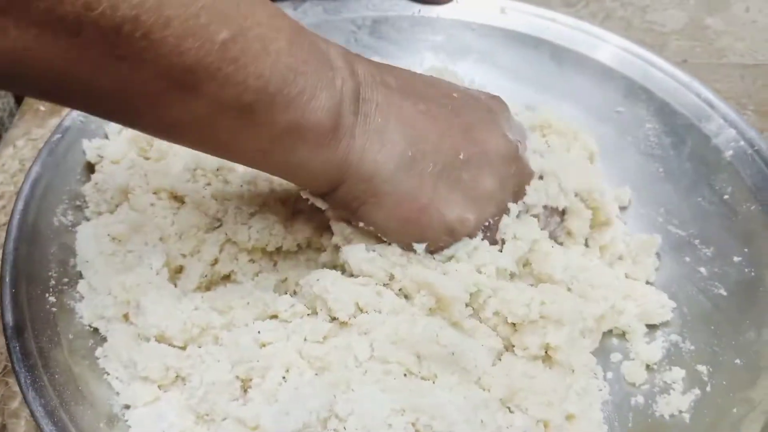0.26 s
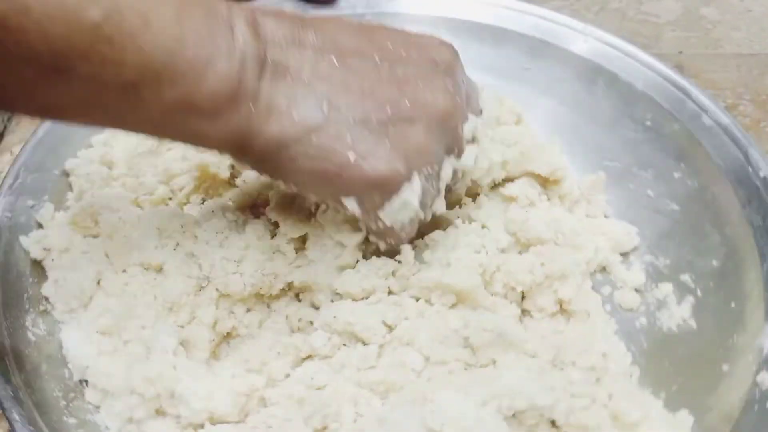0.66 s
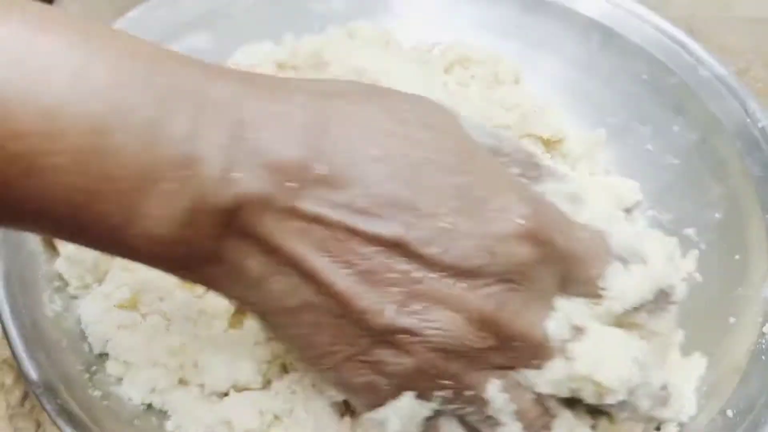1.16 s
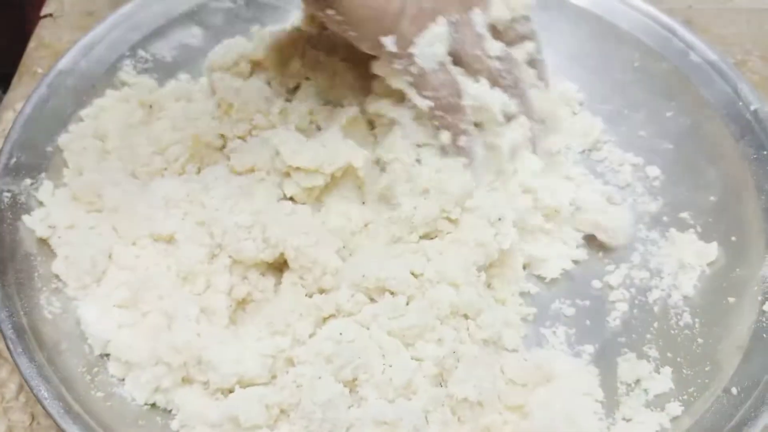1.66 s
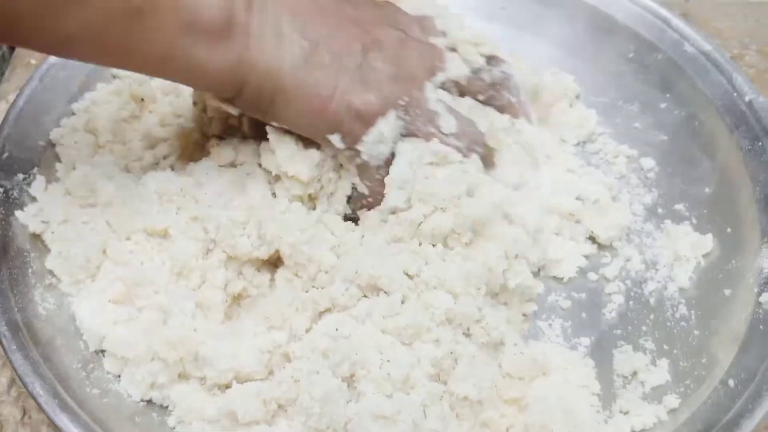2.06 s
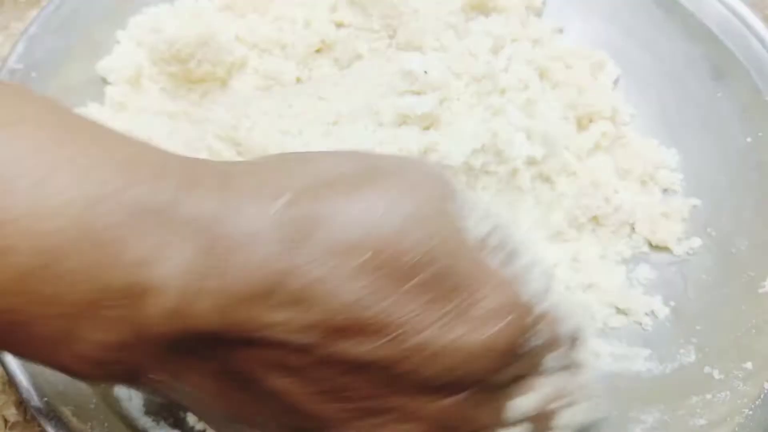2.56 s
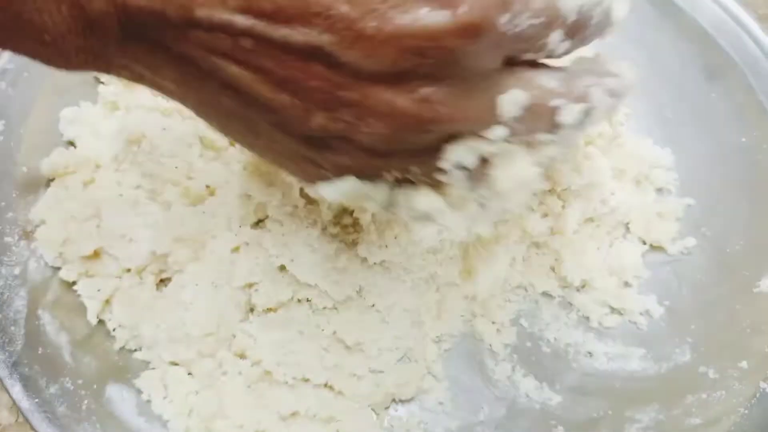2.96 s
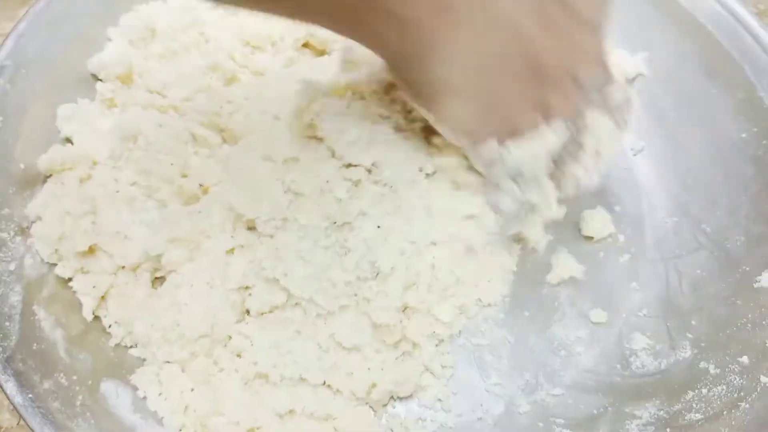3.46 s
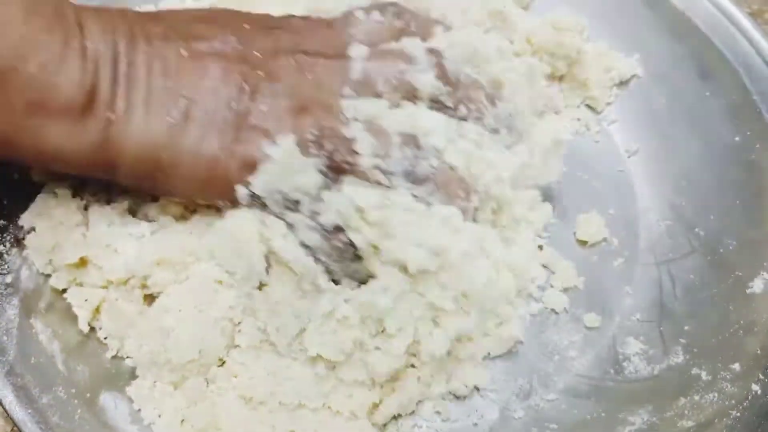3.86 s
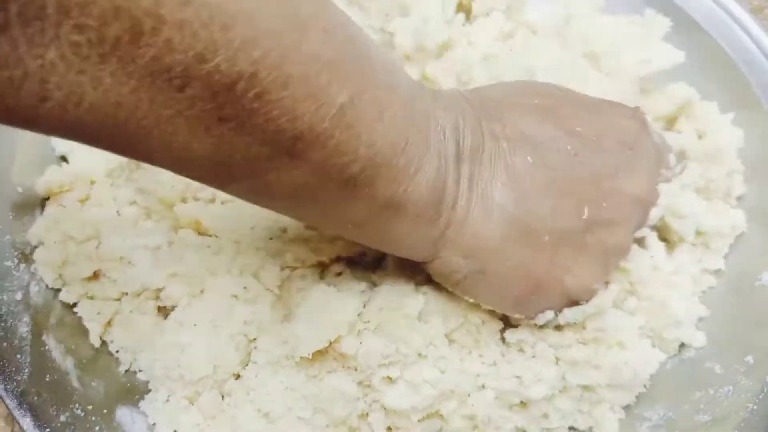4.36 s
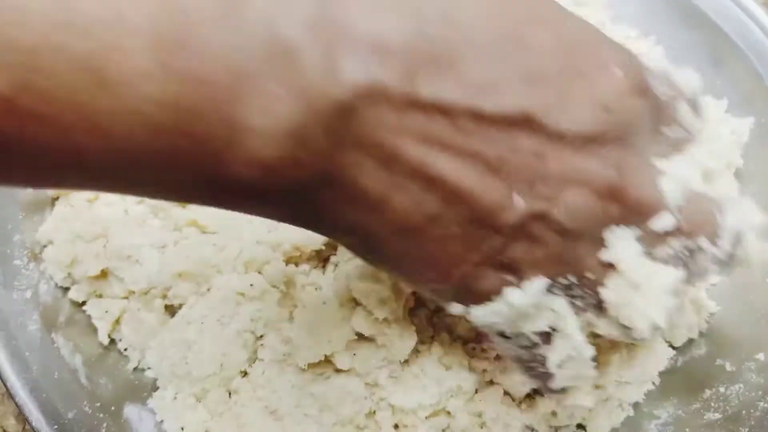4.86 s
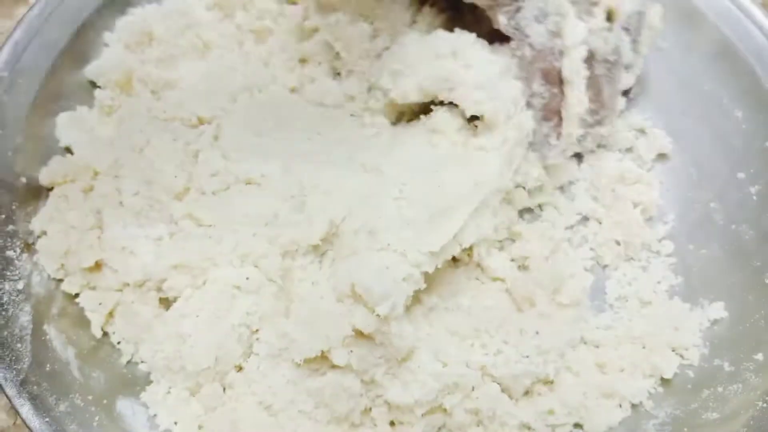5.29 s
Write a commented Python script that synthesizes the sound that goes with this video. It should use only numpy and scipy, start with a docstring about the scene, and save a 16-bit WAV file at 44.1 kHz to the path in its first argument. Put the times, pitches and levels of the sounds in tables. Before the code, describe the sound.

Moist crumbs rustle and hiss over a wide metal plate under a working hand, with dull pats, sharp ticks and a faint hum.

```python
"""Crumbly dough rustles softly under a kneading hand in a wide steel plate.
Sweeping fingers drag crumbs over the steel, which hisses, ticks and once clinks; lumps land with dull pats.
Random slips and noise bursts excite filters shaped like dough and steel; friction keeps plate modes sounding.
A low hum of two noise drones, rising tones and faint hiss fills the room; both channels are alike."""
import sys
import numpy as np
from scipy import signal
from scipy.fft import rfft, irfft, next_fast_len
from scipy.io import wavfile

SR = 44100
rng = np.random.default_rng(int(sys.argv[2]) if len(sys.argv) > 2 else 0)


def materialize(psi):
    """Save the field psi as 16-bit PCM at rate SR to the path in sys.argv[1].

    A 1-D psi becomes a single channel; in a 2-D psi each row is a channel.
    """
    bounded = np.clip(np.atleast_2d(psi).T, -1, 1)
    quanta = np.round(bounded * 32767).astype(np.int16)
    wavfile.write(sys.argv[1], SR, quanta)


N = 243695
TIME = np.arange(N) / SR

# strokes of the hand: full_pressure_s, attack_s, hold_s, release_s, dough_db, fine_crumbs_db, coarse_crumbs_db
HAND_STROKES = [ (.03, 0.14, 0.34, .5, -47.5, -50.5, -56.5), (.32, 0.24, 0.016, 0.15, -49, -49.5, -78),
                (.52, 0.32, 0.14, 0.31, -51.5, -59, -65), (.745, 0.24, 0.074, 0.063, -56, -47.5, -55.5),
                (1.02, 0.043, 0.14, 0.24, -64, -57, -56), (1.21, 0.13, 0.091, 0.44, -48.5, -41.5, -68),
                (1.45, 0.17, 0.14, 0.29, -49, -47.5, -72), (1.69, 0.16, 0.026, 0.14, -50.5, -41.5, -59),
                (1.98, .1, 0.097, .04, -51, -45.5, -52), (2.097, 0.0076, 0.0071, 0.1, -39, -31, -39),
                (2.28, 0.12, 0.017, 0.029, -72, -50.5, -58.5), (2.505, .02, .04, 0.15, -79, -32, -65),
                (2.59, 0.077, 0.042, 0.084, -46, -23, -44), (2.79, 0.099, 0.005, 0.04, -69, -49.5, -57),
                (3.053, 0.021, 0.046, 0.42, -44, -33, -41.5), (3.17, 0.079, 0.18, 0.11, -53.5, -34, -43),
                (3.57, 0.3, 0.057, 0.11, -55, -46, -50), (3.8, 0.095, 0.064, .1, -59, -46.5, -56),
                (4.0, 0.24, .2, .19, -47, -34.5, -42.5), (4.42, 0.1, .14, 0.15, -54, -43.5, -54),
                (4.65, 0.063, 0.0067, 0.049, -68, -38, -52), (4.89, 0.18, .05, .1, -73, -53.5, -63),
                (4.963, 0.03, 0.14, 0.31, -53.5, -29.5, -50), (5.28, 0.34, 0.063, 0.28, -47, -36, -49)]
# moist dough, coloration of the rustle: frequency_hz, relative_level_db_per_hz
DOUGH_SPECTRUM = [(300, -21.5), (500, -15), (650, -20), (860, -5.5), (1050, -5.5), (1500, 0.5), (2200, 4.5),
                  (3200, 2), (4500, -5), (7000, 0), (10000, -5), (13500, -21.5), (15500, -10.5)]
# pockets of air squish out of the dough: centre_s, length_s, pitch_hz, level_db
AIR_POCKETS = [(0.064, 0.21, 1080, -57.5), (0.586, .05, 4080, -50), (0.727, 0.14, 510, -64.5),
               (0.918, 0.38, 2850, -60), (1.31, 0.41, 505, -62), (2.056, 0.11, 890, -56),
               (2.073, 0.044, 1800, -45.5), (3.404, .096, 810, -60.5), (3.632, 0.034, 785, -68),
               (3.945, 0.18, 1050, -58.5), (4.413, 0.036, 4270, -41.5), (4.615, 0.23, 620, -61),
               (5.19, 0.51, 890, -61), (5.345, 0.031, 954, -47), (5.498, 0.046, 794, -60.5)]
# sticky dough peels from the skin: centre_s, length_s, level_db
SKIN_PEELS = [(0.633, 0.024, -48.5), (0.765, 0.21, -48), (4.127, .26, -51.5), (4.655, 0.14, -49.5)]
# a soft thud as the hand takes hold: centre_s, length_s, pitch_hz, width_hz, level_db
GRIP_THUD = [(1.99, 0.018, 64, 46.3, -49.5)]
# dough lands on the plate: start_s, level_db, decay_to_minus_60_db_s
DOUGH_LANDINGS = [(2.091, -43.5, 0.04), (2.487, -47, 0.3), (3.046, -35.5, 0.087), (3.053, -39.5, 0.23),
                  (4.961, -46.5, 0.36)]
# dull spectrum of a landing lump: frequency_hz, relative_level_db_per_hz
LANDING_SPECTRUM = [(80, -25), (200, -1), (350, 3), (520, -2), (700, -8), (860, -5), (1200, -25),
                    (3000, -58)]
# fine crumbs hissing on steel: frequency_hz, relative_level_db_per_hz
FINE_CRUMB_SPECTRUM = [(1500, -43), (2700, -27), (3600, -18.5), (4450, -9.5), (4950, -2.5), (5700, -0.5),
                       (6600, -2), (7200, -8.5), (8200, -15), (9500, -20), (11500, -24.5), (13700, -30.5),
                       (15000, -13), (16000, -26)]
# coarse crumbs rasping: frequency_hz, relative_level_db_per_hz
COARSE_CRUMB_SPECTRUM = [(1500, -41), (2600, -10), (3300, -0.5), (4400, 1.5), (5500, -15), (8000, -23)]
# a finger rubs the bare steel and makes it sing: full_pressure_s, attack_s, hold_s, release_s, level_db
SINGING_RUBS = [(.77, 0.11, .02, 0.075, -51.5), (1.01, 0.058, 0.027, 0.14, -54.5),
                (1.17, 0.11, .02, 0.21, -44)]
# resonances of the rubbed steel: frequency_hz, width_hz, relative_level_db
SINGING_MODES = [(2154, 140, -4.5), (2220, 440, -6)]
# the hand bears down and the floor of the plate resounds: full_pressure_s, attack_s, hold_s, release_s, level_db
BEARING_PUSHES = [(2.12, .1, 0.27, .1, -75), (2.49, 0.0063, 0.098, .1, -54.5),
                  (2.58, .09, 0.076, 0.07, -44.5), (3.053, 0.016, 0.0033, 0.088, -42),
                  (4.965, 0.0088, 0.028, 0.29, -48.5)]
# resonances of the plate's floor: frequency_hz, width_hz, relative_level_db
PLATE_FLOOR_MODES = [(850, 56, -3), (1350, 280, -3.5), (2260, 63, 7.5), (2393, 80, 4)]
# nails and hard crumbs tick on the steel: start_s, level_db
STEEL_TICKS = [(2.0948, -18.5), (2.42, -45), (2.487, -24), (2.561, -15), (2.8813, -34), (2.93, -39),
               (3.04, -33), (3.0467, -23.5), (3.0528, -15.5), (3.0732, -14.5), (3.0979, -22),
               (4.037, -25.5), (4.308, -32), (4.456, -28.5), (4.9596, -21), (5.048, -19)]
# bright spectrum of a tick: frequency_hz, relative_level_db_per_hz
TICK_SPECTRUM = [(1500, -20.5), (3900, -41), (4900, 10.5), (6500, 6), (7800, -8), (12500, -23),
                 (15000, -18)]
# hard knocks that ring the whole plate: start_s, level_db
PLATE_KNOCKS = [(0.037, -51), (.512, -43), (.85, -41.5), (1.183, -15), (1.1856, -21.5), (2.095, -50)]
# plate resonances: frequency_hz, width_hz, relative_level_db
PLATE_MODES = [(871, 130, -8), (935, 160, -9.5), (1450, 350, -14), (2017, 126, 2), (2200, 280, 3),
               (2720, 1250, -8.5), (3400, 72, 0.5), (3745, 180, -4), (4980, 200, -2), (5710, 480, 3.5),
               (6670, 720, -5), (9580, 1000, -6), (8900, 12000, -28), (15200, 990, -15)]
# the free rim rings on after each contact: frequency_hz, width_hz, relative_level_db
FREE_RIM_MODES = [(2370, 13, -2), (3520, 15, -7)]
# course of the room hum, before trim: time_s, lower_drone_db, upper_drone_db
HUM_LEVELS = [(0.0, -53, -43), (1.86, -52, -49), (2.08, -46, -49), (2.14, -57, -64.5), (2.72, -46.5, -52.5),
              (3.57, -50.5, -48), (3.83, -52, -54), (3.94, -45, -54.5), (4.68, -52, -50),
              (5.26, -52, -61.5), (5.53, -48.5, -69)]
# lower drone: frequency_hz, relative_level_db_per_hz
LOW_DRONE_SPECTRUM = [(20, -38.5), (45, -29), (70, -23), (90, -13.5), (110, -3), (145, -1.5), (180, -8),
                      (240, -30), (400, -33)]
# low room modes that carry the upper drone: frequency_hz, width_hz, relative_level_db
LOW_ROOM_MODES = [(174.1, 20, -3.5), (194.1, 8.5, 4.5), (222.5, 15.8, -3), (257, 13.6, -5),
                  (275.9, 9.4, -1), (308.2, 19.2, -8), (194.3, 78, -11.5), (445, 45, -26)]
# notes that swell in the hum: full_level_s, hold_s, pitch_hz at that time, level_db
HUM_NOTES = [(2.201, 0.37, 101.3, -49.5), (2.646, 0.96, 108.4, -46.5), (3.402, 0.33, 99.9, -49.5),
             (3.921, 0.19, 108, -42), (4.36, 0.2, 138.5, -44), (4.899, 0.18, 123.9, -47.5),
             (5.381, .1, 102.2, -49.5)]
# faint hiss: frequency_hz, relative_level_db_per_hz
HISS_SPECTRUM = [(300, -7), (1000, -5.5), (2500, -19), (4000, 2), (6000, 9.5), (12000, -15), (16000, -40.5)]

ATTACK_CURVE = 1.3  # pressure builds as this power of time
FADE_DB = 20  # level lost in one release time
DOUGH_SAG_DB_PER_S, STEEL_SAG_DB_PER_S = 7.5, 5.5  # the dough gives way while the pressure is held
RESTING_DB = -78  # the dough stirs faintly even between strokes
SQUISH_WIDTH = 0.3  # bandwidth as a share of the pitch
PEEL_HZ, PEEL_WIDTH_HZ = 10500, 18000
RIM_DB = -28
LOW_DRONE_TRIM_DB, HIGH_DRONE_TRIM_DB, HISS_DB = 1.4, 0.72, -66
NOTE_RISE_HZ_PER_S, NOTE_ATTACK_S, NOTE_RELEASE_S, OCTAVE_DB = 14, 0.2, 0.11, -19.5
NOTE_WAVER_DB, NOTE_WAVER_PER_S = 1.8, 10
ROOM_T60_S, ROOM_DB = 0.28, -13.5
CUTOFF_HZ = 15900


def dough(gain):
    """Granular shear: moist crumbs slip and part under the palm."""
    slips = grains(per_s=3500, spread_db=-1.5) * from_db(1.2 * drift(45))
    moving = shifting(slips, patchy_db=2.9, rate=24)
    return gain * colour(moving, DOUGH_SPECTRUM)


def squishes():
    """Cavity resonance: each air pocket has its own pitch; peeling is always the same high fizz."""
    pockets = [(s, length, hz, SQUISH_WIDTH * hz, db) for s, length, hz, db in AIR_POCKETS]
    peels = [(s, length, PEEL_HZ, PEEL_WIDTH_HZ, db) for s, length, db in SKIN_PEELS]
    return swells(pockets + peels)


def pats():
    """Soft impact: yielding lumps give dull, crumbling thuds."""
    impacts = sum(from_db(db) * burst(s, t60) for s, db, t60 in DOUGH_LANDINGS)
    return colour(impacts, LANDING_SPECTRUM)


def scrape(fine_gain, coarse_gain):
    """Friction excitation: dragged crumbs drive the dense high modes of steel; coarse ones rasp lower."""
    slips = grains(per_s=5000, spread_db=1.5) * from_db(0.82 * drift(120))
    ringing = rms_one(diffuse(slips, t60=0.81, wet_db=-11))
    fine = colour(ringing, FINE_CRUMB_SPECTRUM)
    coarse = colour(grains(per_s=4000, spread_db=2.5), COARSE_CRUMB_SPECTRUM)
    return fine_gain * fine + coarse_gain * coarse


def rubbed_plate():
    """Sustained modal excitation: skin friction keeps the lower modes of the plate sounding."""
    singing_gain = pushes(SINGING_RUBS, STEEL_SAG_DB_PER_S)[0]
    singing = singing_gain * resonate(rng.standard_normal(N), SINGING_MODES)
    bearing_gain = pushes(BEARING_PUSHES, STEEL_SAG_DB_PER_S)[0]
    bearing = bearing_gain * resonate(grains(per_s=4500, spread_db=9.0), PLATE_FLOOR_MODES)
    return singing + bearing


def ticks():
    """Impact with damping: short bright contacts, quickly damped by the dough."""
    contacts = sum(from_db(db) * burst(s, t60=.013) for s, db in STEEL_TICKS)
    return colour(diffuse(contacts, t60=0.13, wet_db=-5.5), TICK_SPECTRUM)


def knocks():
    """Modal response to impact: a brief clatter, then a fading wash in the plate's resonances."""
    force = np.zeros(N)
    for s, db in PLATE_KNOCKS:
        clatter = burst(s, t60=0.021)
        wash = from_db(-10.5) * burst(s, t60=0.2)
        force += from_db(db) * (clatter + wash)
    return resonate(force, PLATE_MODES)


def rim(contact):
    """Lightly damped resonance: narrow modes of the free rim ring on after each contact."""
    return from_db(RIM_DB) * resonate(contact, FREE_RIM_MODES)


def hum():
    """Filtered noise and tones: two drones with rising notes in them, over faint hiss."""
    low_db, high_db = in_time(HUM_LEVELS)
    lower = from_db(low_db + LOW_DRONE_TRIM_DB) * colour(rng.standard_normal(N), LOW_DRONE_SPECTRUM)
    upper = from_db(high_db + HIGH_DRONE_TRIM_DB) * resonate(rng.standard_normal(N), LOW_ROOM_MODES)
    hiss = from_db(HISS_DB) * colour(rng.standard_normal(N), HISS_SPECTRUM)
    return lower + upper + sum(note(*row) for row in HUM_NOTES) + hiss


def note(s, hold, hz, db):
    """Phase as the integral of frequency: a wavering low tone and its octave glide upward."""
    pitch_hz = hz + NOTE_RISE_HZ_PER_S * (TIME - s) + 1.52 * drift(20)
    phase = 2 * np.pi * np.cumsum(pitch_hz) / SR
    waver = from_db(db + NOTE_WAVER_DB * drift(NOTE_WAVER_PER_S))
    gain = waver * envelope(s, NOTE_ATTACK_S, hold, NOTE_RELEASE_S)
    return gain * (np.sin(phase) + from_db(OCTAVE_DB) * np.sin(2 * phase))


def envelope(s, attack, hold, release, sag_db_per_s=0):
    """Exponential decay after a rise: gain reaches 1 at time s, sags while held, then dies away."""
    age = TIME - s
    rise = np.clip(1 + age / attack, 0, 1) ** ATTACK_CURVE
    fades = np.clip((age - hold) / release, 0, 10)
    return rise * from_db(-FADE_DB * fades - sag_db_per_s * np.clip(age, 0, hold))


def pushes(rows, sag_db_per_s):
    """Power addition: overlapping pushes sum in power, giving one gain for each level column."""
    power = sum(np.outer(from_db(row[4:]), envelope(*row[:4], sag_db_per_s)) ** 2 for row in rows)
    return np.sqrt(power)


def grains(per_s, spread_db):
    """Random impulse train: tiny slips of uneven size at random moments, with unit power."""
    sizes = from_db(spread_db * np.minimum(rng.exponential(1, N), 4))
    signed = sizes * rng.choice([-1, 1], N)
    return rms_one(signed * (rng.random(N) < per_s / SR))


def swells(rows):
    """Resonance under a bell-shaped gain: each row is a short swell of fine slips in one band."""
    out = np.zeros(N)
    slips = grains(per_s=7400, spread_db=1.5)
    for s, length, hz, width, db in rows:
        swell = np.exp(-np.minimum((2 * (TIME - s) / length) ** 2, 20))
        out += resonate(slips * swell * from_db(db), [(hz, width, 0)])
    return out


def shifting(x, patchy_db, rate):
    """Changing gaps between fingers and dough: each narrow band swells and fades by itself."""
    spectrum, out = rfft(x), 0
    band = np.sqrt(np.arange(len(spectrum)) * SR / N / 8)  # bands widen with frequency
    for k in range(int(band[-1]) + 2):
        weight = np.maximum(1 - abs(band - k), 0)
        out = out + irfft(spectrum * weight, N) * from_db(patchy_db * drift(rate))
    return rms_one(out)


def burst(start, t60):
    """Exponential decay: noise starts at once and falls 60 dB in t60 seconds."""
    age = TIME - start
    return rng.standard_normal(N) * (age >= 0) * from_db(-60 * np.clip(age / t60, 0, 3))


def diffuse(x, t60, wet_db):
    """Reverberation: convolution with decaying noise adds a tail of many close, dying modes."""
    tail = burst(0, t60)[:SR // 2]
    return x + from_db(wet_db) * signal.fftconvolve(x, tail / np.linalg.norm(tail))[:N]


def resonate(x, modes):
    """Modal superposition: parallel resonances with about unit power gain."""
    power = sum(from_db(db) ** 2 * width * 2 / SR for hz, width, db in modes)
    out = 0
    for hz, width, db in modes:
        edges = np.clip([hz - width / 2, hz + width / 2], 10, SR / 2 - 10)
        band = signal.butter(2, edges, "band", fs=SR, output="sos")
        out = out + from_db(db) * signal.sosfilt(band, x)
    return out / np.sqrt(power)


def colour(x, spectrum):
    """Minimum-phase filtering: a causal filter with the given spectrum and unit power gain."""
    size = next_fast_len(N + 8192, True)
    hz = np.maximum(np.arange(size // 2 + 1) * SR / size, 1)
    points = np.array(spectrum)
    level_db = np.interp(np.log(hz), np.log(points[:, 0]), points[:, 1])
    level_db -= 60 * np.maximum(np.log2(hz / points[-1, 0]), 0)  # dB per octave above the last point
    gain = rms_one(from_db(level_db))
    # folding the cepstrum onto positive time gives the minimum phase
    cepstrum = irfft(np.log(gain), size)
    cepstrum[1:size // 2] *= 2
    cepstrum[size // 2 + 1:] = 0
    return irfft(rfft(x, size) * np.exp(rfft(cepstrum)), size)[:N]


def drift(rate):
    """Slow random modulation: chance of spread about 1, with rate new values a second."""
    knots = rng.standard_normal(4000)
    # 1.22 restores the spread lost between knots
    return 1.22 * np.interp(TIME * rate, np.arange(len(knots)), knots)


def in_time(rows):
    """Linear interpolation: each column of a curve at every sample."""
    s, *columns = np.transpose(rows)
    return [np.interp(TIME, s, c) for c in columns]


def from_db(db):
    """Logarithmic level: decibels to amplitude gain."""
    return 10 ** (np.asarray(db) / 20)


def rms_one(x):
    """Power normalization: scale to unit mean square."""
    return x / np.sqrt(np.mean(x ** 2) + 1e-20)


def scene():
    """Superposition: hand and plate reverberate in a small room, with the hum added, in two like channels."""
    dough_gain = pushes(HAND_STROKES, DOUGH_SAG_DB_PER_S)[0] + from_db(RESTING_DB)
    fine_gain, coarse_gain = pushes(HAND_STROKES, STEEL_SAG_DB_PER_S)[1:]
    kneading = dough(dough_gain) + squishes() + swells(GRIP_THUD) + pats()
    steel = scrape(fine_gain, coarse_gain) + rubbed_plate() + ticks() + knocks()
    contact = kneading + steel
    in_room = diffuse(contact + rim(contact), t60=ROOM_T60_S, wet_db=ROOM_DB)
    return np.tile(in_room + hum(), (2, 1))


def record(dry):
    """Band limiting: a steep elliptic low-pass cuts the top."""
    lowpass = signal.ellip(12, .2, 80, CUTOFF_HZ, fs=SR, output="sos")  # ripple dB, rejection dB
    return signal.sosfilt(lowpass, dry)


dry = scene()
out = record(dry)
materialize(out)
```